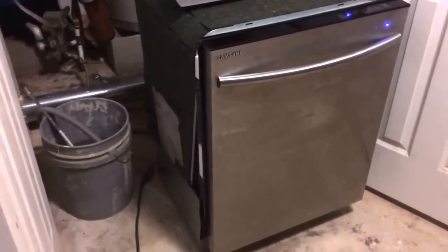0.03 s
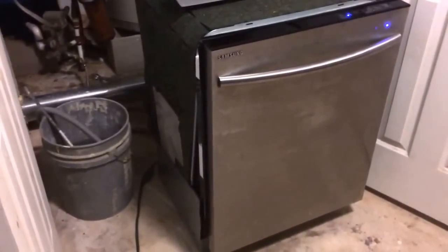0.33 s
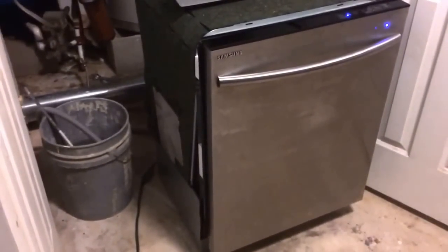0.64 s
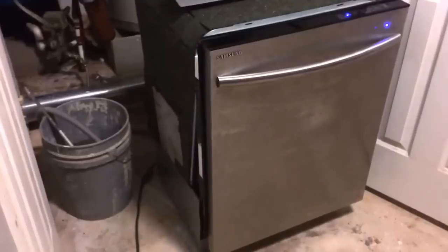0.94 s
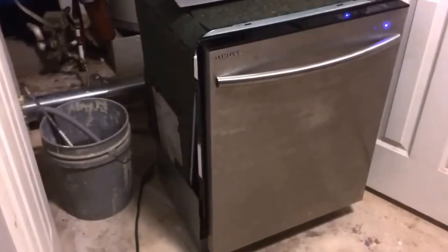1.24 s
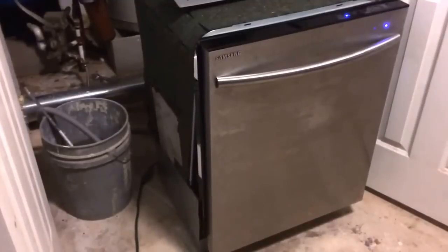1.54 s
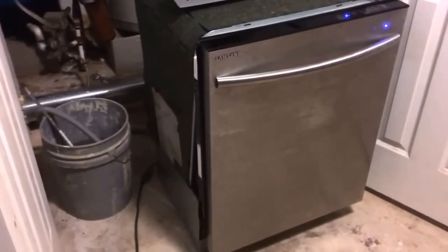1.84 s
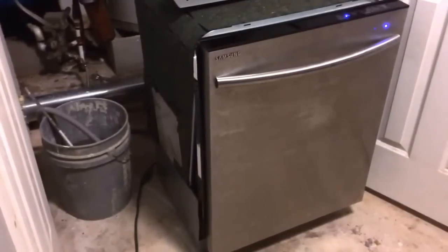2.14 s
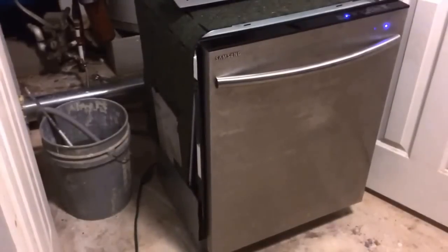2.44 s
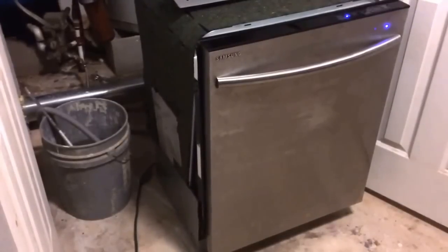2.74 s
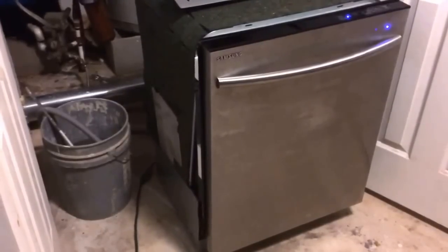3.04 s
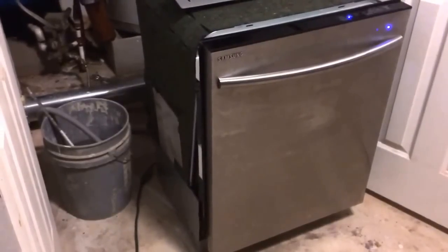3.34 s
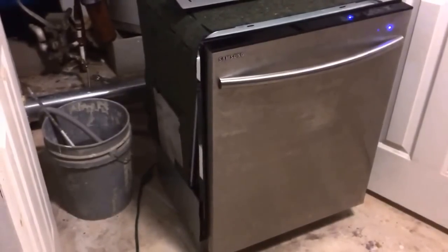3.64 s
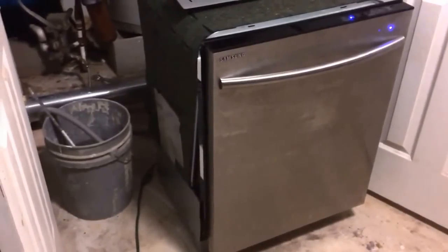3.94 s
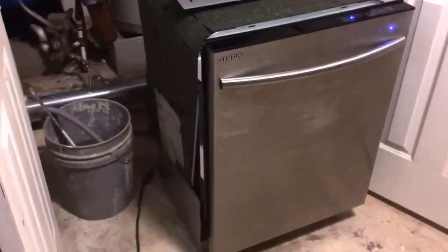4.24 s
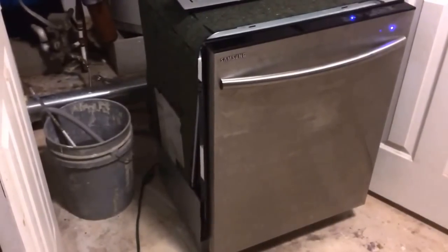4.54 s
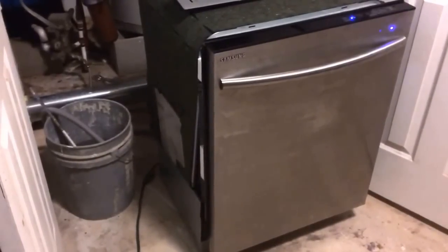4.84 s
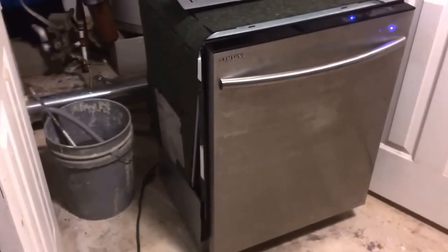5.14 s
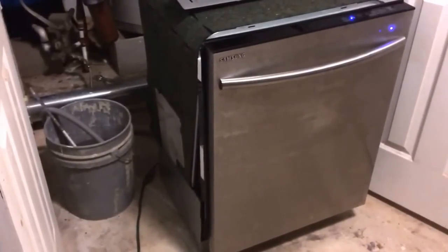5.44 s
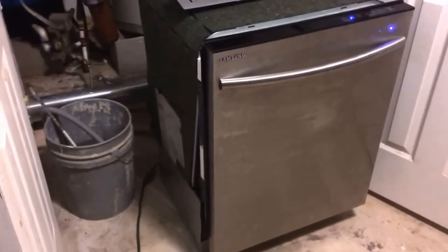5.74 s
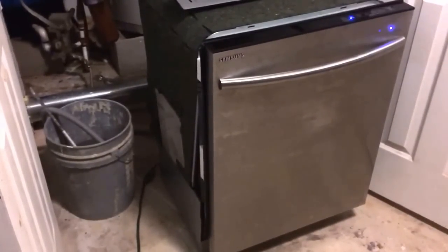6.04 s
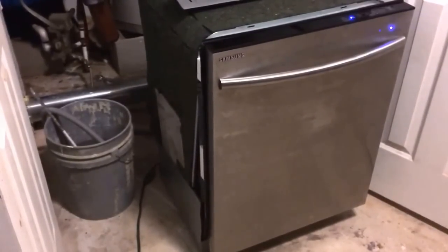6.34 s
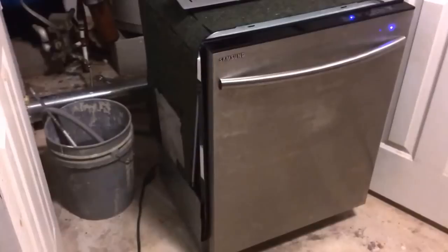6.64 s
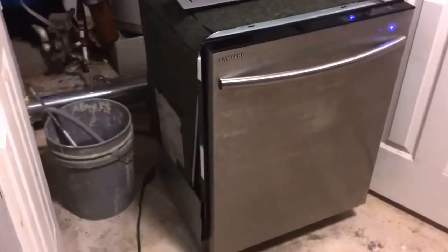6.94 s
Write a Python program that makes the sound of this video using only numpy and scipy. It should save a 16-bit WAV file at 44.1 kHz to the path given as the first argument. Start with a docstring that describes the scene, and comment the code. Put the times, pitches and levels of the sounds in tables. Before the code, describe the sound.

A dishwasher hums steadily while water jets sweep across its steel door about once a second, splashing and drumming.

```python
"""Dishwasher in a garage.

The pump motor hums steadily while the spray arm turns inside. About every 1.2 s a jet
sweeps across the steel door: its drops splash and drum, and the whole sheet booms.
Between sweeps, other jets patter on the far wall and swish along the side of the tub."""
import sys
import numpy as np
from scipy.fft import rfft, irfft
from scipy.io import wavfile
from scipy.ndimage import uniform_filter1d, map_coordinates

SR = 44100
rng = np.random.default_rng(int(sys.argv[2]) if len(sys.argv) > 2 else 0)


def unload_audio(sound):
    """Save the sound as a 16-bit wav file, at the path given as the first command line argument."""
    columns = np.transpose(np.atleast_2d(sound))
    # keep every value between -1 and 1, then stretch to whole-number steps
    steps = np.round(np.clip(columns, -1, 1) * 32767)
    wavfile.write(sys.argv[1], SR, steps.astype(np.int16))


N = 308700  # 7 s


def amp(db):
    """Decibels to gain."""
    return 10 ** (np.asarray(db) / 20)


def unit(x):
    """Scale to rms 1."""
    return x / np.sqrt(np.mean(x ** 2) + 1e-20)


def clock():
    """Sample times in seconds."""
    return np.arange(N) / SR


def wobble(rate_hz):
    """Smooth random curve with knots at rate_hz."""
    return map_coordinates(rng.standard_normal(int(N * rate_hz / SR) + 4), [clock() * rate_hz])


def filtered(x, response):
    """Apply a frequency response."""
    return irfft(rfft(x) * response(np.fft.rfftfreq(N, 1 / SR)), N)


def coloured(x, spectrum):
    """Shape x by (freq_hz, gain_db) points, at rms 1."""
    hz, db = np.transpose(spectrum)
    return unit(filtered(x, lambda f: amp(np.interp(np.log(f + 1), np.log(hz), db))))


def resonate(x, modes, order=4):
    """Pass x through a panel's modes, at rms 1; it radiates little below or above them."""
    low_hz, high_hz = modes[0][0] * 0.46, modes[-1][0] * 1.62

    def response(f):
        ring = sum((-1) ** k * amp(db) * 1j * f * width / (hz * hz - f * f + 1j * f * width)
                   for k, (hz, width, db) in enumerate(modes))
        rolloff = (1 + (low_hz / (f + 1)) ** (2 * order)) * (1 + (f / high_hz) ** (2 * order))
        return ring / np.sqrt(rolloff)
    return unit(filtered(x, response))


def tones(rows):
    """Sum of sines that waver in level and phase."""
    t, total = clock(), np.zeros(N)
    for hz, db, waver_db in rows:
        gain = amp(db + waver_db * wobble(8))
        phase = 2 * np.pi * (hz * t + rng.random()) + 0.12 * waver_db * wobble(4.6)
        total += gain * np.sin(phase)
    return np.sqrt(2) * total


def drops(per_s, scatter_db):
    """Impacts of random size at random times, at rms 1."""
    hit = rng.random(N) < per_s / SR
    return unit(hit * np.sign(rng.standard_normal(N)) * amp(scatter_db * rng.standard_normal(N)))


def even(x, span_s):
    """Level x: a steady jet delivers the same energy in every span."""
    return x / np.sqrt(np.abs(uniform_filter1d(x ** 2, max(int(span_s * SR), 2))) + 1e-9)


def swell(centre_s, hold_s, attack_s, release_s):
    """Gain of a jet passing over a surface; attack and release each span 10 dB."""
    t = clock() - centre_s
    away = np.maximum(-t - hold_s / 2, 0) / attack_s + np.maximum(t - hold_s / 2, 0) / release_s
    return amp(-10 * away ** 1.5)


# spray arm sweeps: facing_door_s, front_gain_db, side_gain_db
ARM_SWEEPS = [(-0.135, -0.8, 0), (1.1, 0.9, -1.4), (2.35, -0.3, -0.1), (3.545, 0, 0.1), (4.78, -0.7, 0.1),
              (6.005, 0, 0.8), (7.19, 1, -0.3)]
FACING_DOOR_S, FRONT_DB, SIDE_DB = np.transpose(ARM_SWEEPS)


def stroke(shape, gains_db):
    """Gain of one swell repeated on every sweep; overlaps add in power."""
    level_db, lag_s, *envelope_s = shape
    return np.sqrt(sum((amp(level_db + gain_db) * swell(facing_s + lag_s, *envelope_s)) ** 2
                       for facing_s, gain_db in zip(FACING_DOOR_S, gains_db)))


def drive_db(front, side, front_slope=1, floor_db=-120):
    """Level of a part that the jet reaches first from the side, then from the front."""
    power = stroke(front, front_slope * FRONT_DB) ** 2 + stroke(side, SIDE_DB) ** 2
    return 10 * np.log10(power + amp(floor_db) ** 2)


# garage background spectrum: freq_hz, gain_db
GARAGE_SPECTRUM = [(15, -0.5), (30, 3.5), (70, 8.5), (150, 10), (280, 1), (600, -3.5), (1200, -16.5),
                   (2000, -29.5), (5000, -27), (10000, -29), (15000, -33.5)]


def garage():
    """Quiet, low background noise."""
    return amp(-59.5 + 0.45 * wobble(9)) * coloured(rng.standard_normal(N), GARAGE_SPECTRUM)


# pump and motor tones: pitch_hz, level_db, waver_db
PUMP_TONES = [(46.7, -68, 0.5), (59.7, -61, 2.5), (82.1, -58, 4), (120.2, -42, .25), (178.9, -67, 3.5),
              (231.4, -79.5, 6)]


def pump():
    """Motor hum at twice the mains rate, with weaker mains and shaft tones."""
    return tones(PUMP_TONES)


# stray drops: start_s, level_db, pitch_hz
STRAY_DROPS = [(2.082, -63, 13800), (2.193, -59, 13500), (2.433, -64, 13500), (2.439, -60, 11000),
               (2.451, -58, 8900), (6.122, -56, 10100), (6.615, -58, 13200)]


def drips(t60_s=0.02, relative_width=0.19, trim_db=-9):
    """Stray drops land with tiny bright ticks."""
    t, ticks = clock(), np.zeros(N)
    for start_s, db, hz in STRAY_DROPS:
        band = filtered(rng.standard_normal(N), lambda f: np.exp(-((f / hz - 1) / relative_width) ** 2))
        decay_db = 60 * np.clip(t - start_s, 0, 1) / t60_s
        ticks += (t >= start_s) * amp(db + trim_db - decay_db) * unit(band)
    return ticks


# far wall and nozzle resonances: freq_hz, width_hz, gain_db
WALL_MODES = [(930, 76, 2), (1075, 49, -5.5), (1377, 63, 3.5), (1454, 52, 0), (1470, 64, -4.5),
              (1564, 42, -3)]
NOZZLE_MODES = [(2530, 150, -11), (2900, 140, -9), (3480, 140, -1), (3960, 130, -5), (4280, 78, 1.5),
                (5370, 170, -12), (6400, 360, -11)]
# stroke: level_db, lag_s, hold_s, attack_s, release_s
WALL_STROKE = (-71.8, -0.59, 0.46, 0.09, 0.15)


def far_jet():
    """A jet patters on the ringing far wall while its nozzle hisses."""
    patter = amp(4 + 1.3 * wobble(35)) * resonate(drops(1200, 3.5), WALL_MODES)
    hiss = amp(-9 + 1.2 * wobble(7.5)) * resonate(drops(6000, 2.2), NOZZLE_MODES)
    return stroke(WALL_STROKE, SIDE_DB) * (patter + hiss)


# glancing passes along the side: centre_s, level_db, hold_s
SIDE_PASSES = [(1.93, -66.5, 0.07), (3.09, -67, 0.08), (4.3, -71, 0.14), (5.55, -63, 0.07),
               (6.775, -69, 0.17)]


def glancing(lead_s=0):
    """Gain of the jet glancing along the side."""
    return sum(amp(db) * swell(centre_s - lead_s, hold_s, attack_s=0.04, release_s=0.11)
               for centre_s, db, hold_s in SIDE_PASSES)


# swish spectrum: freq_hz, gain_db
SWISH_SPECTRUM = [(500, -24), (1000, -10), (1400, 9), (1700, 8.5), (2100, 1), (2500, -23), (4000, -38),
                  (9000, -27), (15000, -37)]
# stroke: level_db, lag_s, hold_s, attack_s, release_s
DOOR_EDGE_STROKE = (-66, -0.14, 0.06, 0.12, 0.15)


def swish():
    """A jet grazes the side and the door's edge with a bright swish."""
    gain = amp(1.5 * wobble(40)) * np.hypot(glancing(), stroke(DOOR_EDGE_STROKE, FRONT_DB))
    return gain * coloured(drops(7000, 4.5), SWISH_SPECTRUM)


def mist():
    """Fine fizz rises where water lands, and runs just ahead of the glancing jet."""
    landing = amp(-57 + 0.46 * drive_db(TUB_FRONT, TUB_SIDE))
    ahead = amp(-45.5) * np.sqrt(glancing(lead_s=0.095))
    gain = np.hypot(landing, ahead) * amp(1.6 * wobble(16))
    return gain * coloured(drops(12000, 3.2), [(3000, -11), (6000, 1.5), (15000, -5.5)])


# brief tones: centre_s, pitch_hz, half_length_s, level_db
BRIEF_TONES = [(0.028, 430, 0.12, -50), (0.04, 812, 0.09, -61), (.93, 4280, 0.0072, -68),
               (1.12, 792, 0.11, -60), (1.26, 243, 0.082, -44.5), (1.337, 813, 0.071, -61.5),
               (4.832, 425, 0.022, -42.5)]


def brief_tones():
    """Brief faint tones swell and fade at scattered moments."""
    t, total = clock(), np.zeros(N)
    for centre_s, hz, half_s, db in BRIEF_TONES:
        envelope = amp(db) * np.exp(-((t - centre_s) / half_s) ** 2)
        total += envelope * np.sin(2 * np.pi * (hz * t + rng.random()))
    return np.sqrt(2) * total


# door flexing as the jet crosses its middle: centre_s, drive_db, half_length_s
DOOR_FLEXES = [(1.198, -43, 0.16), (2.435, -41.5, .1), (3.643, -37.3, 0.13), (4.876, -37.2, 0.11),
               (6.075, -38.5, 0.1)]
# lowest door modes: pitch_hz, gain_db, waver_db
DOOR_MODES = [(48.9, -16, 2), (58.95, -6, 2), (70, -19.5, 9), (109.2, -11, 1.5), (131.2, -19.5, 1.5)]
# stroke from the jet on the side: level_db, lag_s, hold_s, attack_s, release_s
SWAY_STROKE = (-58, -0.47, 0.3, 0.15, 0.2)


def door_boom():
    """The jet swings the whole door sheet in its lowest modes, which beat against the hum."""
    flex = sum(amp(db) / (1 + ((clock() - centre_s) / half_s) ** 4)
               for centre_s, db, half_s in DOOR_FLEXES)
    sway = stroke(SWAY_STROKE, SIDE_DB)
    thud = coloured(drops(400, 1.3), [(15, -6), (30, -4), (55, 7.5), (100, -15), (200, -50)])
    return (flex + sway) * (tones(DOOR_MODES) + amp(-16.5) * thud)


# side panel, door skin, tub floor and splashed door resonances: freq_hz, width_hz, gain_db
PANEL_MODES = [(159, 18, -4), (180.3, 5.9, -0.5), (193.7, 15, -1), (207.4, 13.5, -3.5), (235.4, 6.7, -6),
               (261.3, 12.6, -11), (300.5, 7.2, -5), (324.5, 17, -10), (354.4, 9, -9.5), (362, 4.7, -37)]
SKIN_MODES = [(180.2, 5.6, -2), (195.6, 8.6, 1), (204.5, 8.4, -6), (239.6, 3.9, 1), (301.6, 6.5, -10)]
TUB_MODES = [(420.2, 11, 0.5), (443.6, 21.8, -6.5), (472.4, 8.3, -6), (494.4, 13, -6.5), (531, 83, -18.5),
             (657.3, 12, -14.5), (683.5, 17, -15)]
SPLASH_MODES = [(603, 9.4, 4), (638, 15, -2), (658.8, 7, 8.5), (717.4, 10, -0.5), (738, 11, 1.5),
                (767, 7.1, 1.5), (811, 13.6, 0), (874, 12, 1.5), (902, 13.7, 1), (932.6, 23, -0.5),
                (1032, 14.3, 1), (1090, 31, -3.5), (1144, 32, -1.5), (1176, 14, 3), (1210, 10.7, 2),
                (1260, 28, -5.5), (1305, 18, -3), (1356, 22, -4.5), (1484, 117, -10), (1655, 15, -9),
                (2020, 250, -14)]
# spray spectrum: freq_hz, gain_db
SPRAY_SPECTRUM = [(400, -30), (900, 5.5), (1300, -1), (1700, 1.5), (2150, 1.5), (2550, 1.5), (3000, 1.5),
                  (4100, 0), (4500, -3.5), (4950, -1.5), (5400, -5.5), (7000, -8.5), (10000, -16),
                  (15000, -27)]
# strokes: level_db, lag_s, hold_s, attack_s, release_s
PANELS_FRONT, PANELS_SIDE = (-44.8, 0, 0.22, 0.21, 0.19), (-50.5, -0.44, 0.12, 0.11, 0.2)
TUB_FRONT, TUB_SIDE = (-48.4, -0.01, 0.14, 0.28, 0.31), (-52.3, -0.45, 0.13, 0.13, 0.16)
SPLASH_FRONT, SPLASH_SIDE = (-50.6, -0.07, 0.12, 0.15, 0.31), (-59.3, -0.455, 0.08, 0.15, 0.19)
SPRAY_FRONT, SPRAY_SIDE = (-66.4, -0.025, 0.18, 0.2, 0.2), (-74.8, -0.47, 0.14, 0.27, 0.25)


def near_jet():
    """The jet breaks into drops that drum on the steel and burst into spray."""
    panel_db = drive_db(PANELS_FRONT, PANELS_SIDE, floor_db=-62)
    tub_db = drive_db(TUB_FRONT, TUB_SIDE)
    splash_db = drive_db(SPLASH_FRONT, SPLASH_SIDE, front_slope=1.5)
    spray_db = drive_db(SPRAY_FRONT, SPRAY_SIDE, floor_db=-78.2)
    flutter = wobble(45)  # the stream arrives in lumps
    aim = np.clip((splash_db + 63) / 7, 0, 1)  # 0 off the door, 1 squarely on it
    side = resonate(drops(900, 3.36), PANEL_MODES)
    skin = resonate(drops(900, 3.4), SKIN_MODES)
    crossfade_rad = 1.11 * aim
    panels = even(np.cos(crossfade_rad) * side + np.sin(crossfade_rad) * skin, span_s=0.18)
    tub = even(resonate(drops(900, 3.1), TUB_MODES), span_s=0.15)
    splash = even(resonate(drops(1800, 3.5), SPLASH_MODES), span_s=0.23)
    spray = coloured(drops(16000, 3.1), SPRAY_SPECTRUM)
    return (amp(panel_db + 0.95 * flutter) * panels
            + amp(tub_db + 1.1 * flutter) * tub
            + amp(splash_db - 4.5 + 0.94 * aim + 0.93 * flutter) * splash
            + amp(spray_db + 0.53 + 1.8 * aim + 0.88 * flutter) * spray)


def scene():
    """The machine over the garage background, in mono."""
    background = garage()
    water = near_jet() + far_jet() + swish() + mist() + drips()
    return (background + water + pump() + door_boom() + brief_tones())[None]


def record(dry):
    """Brick-wall low-pass."""
    return filtered(dry, lambda hz: hz < 15350)


dry = scene()
out = record(dry)
unload_audio(out)
```